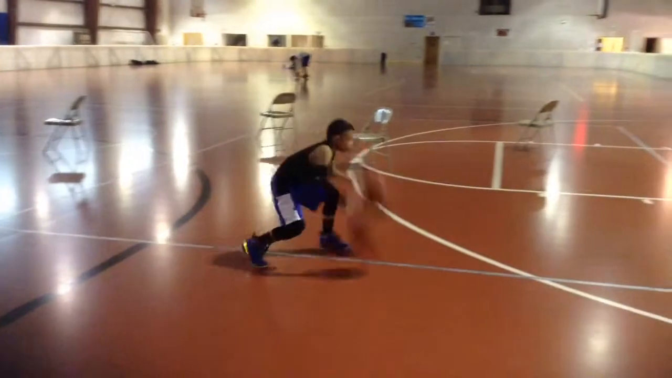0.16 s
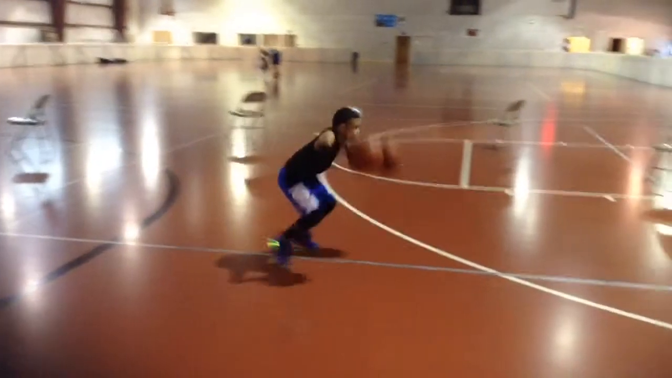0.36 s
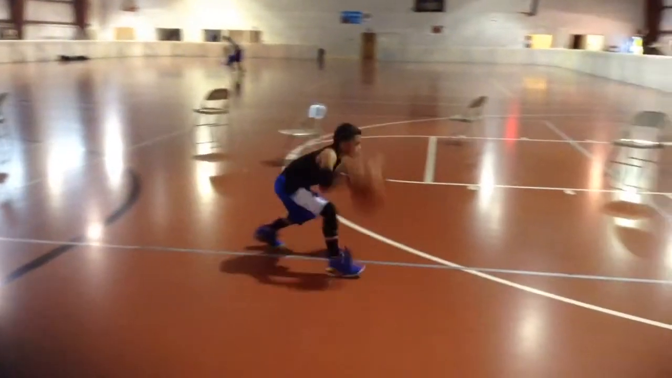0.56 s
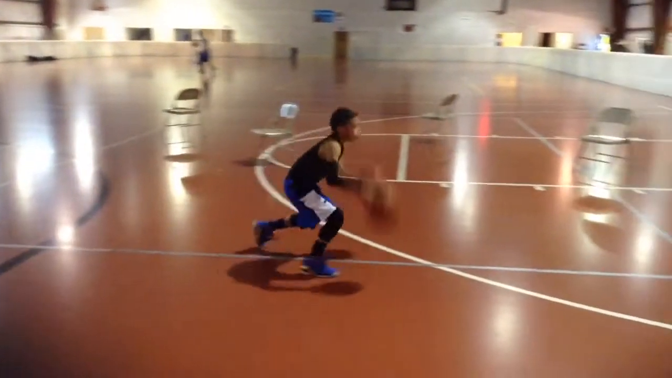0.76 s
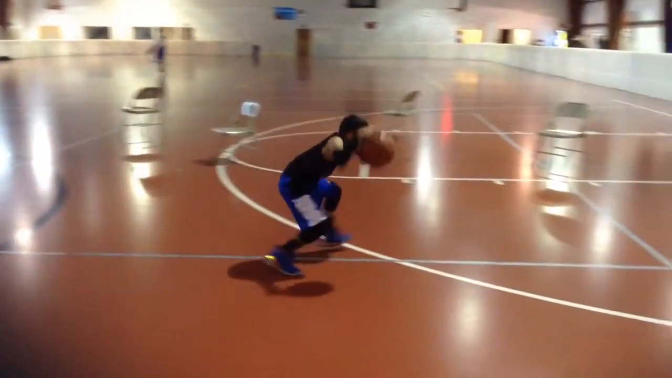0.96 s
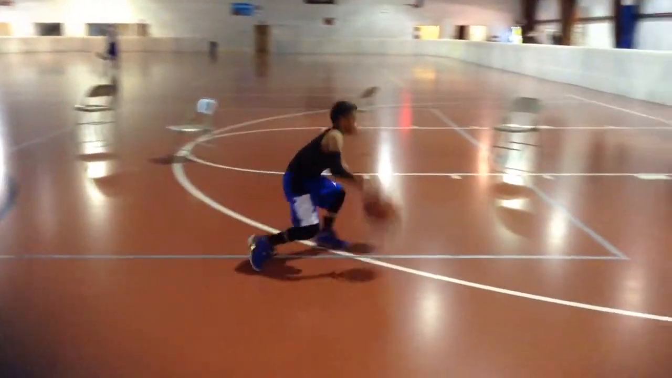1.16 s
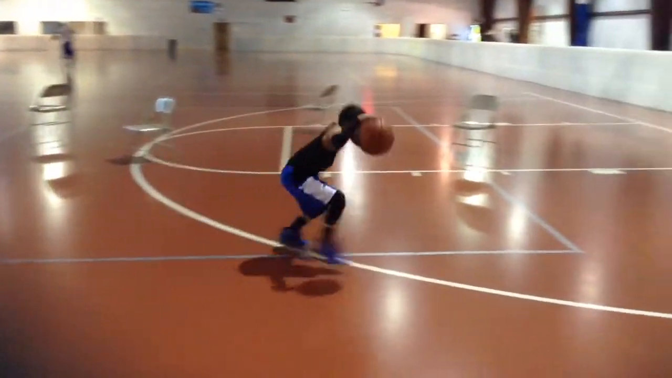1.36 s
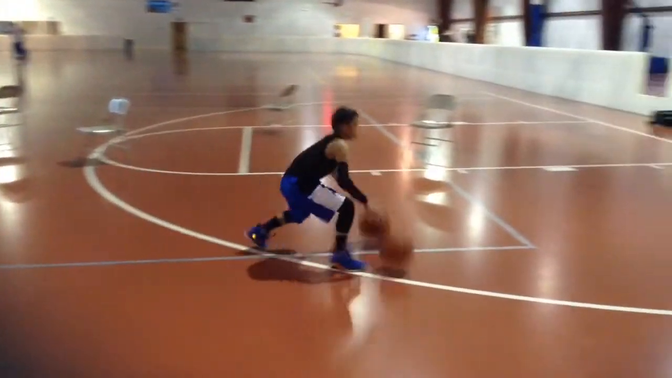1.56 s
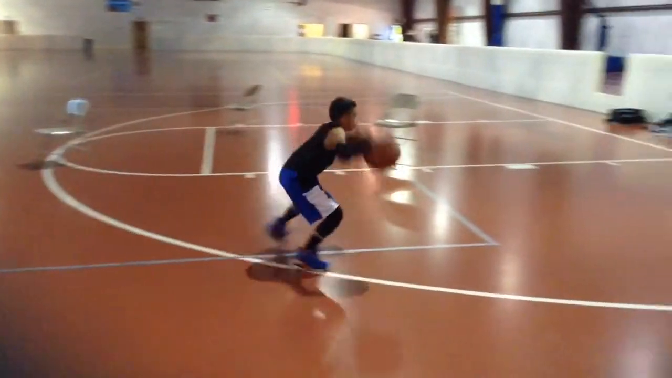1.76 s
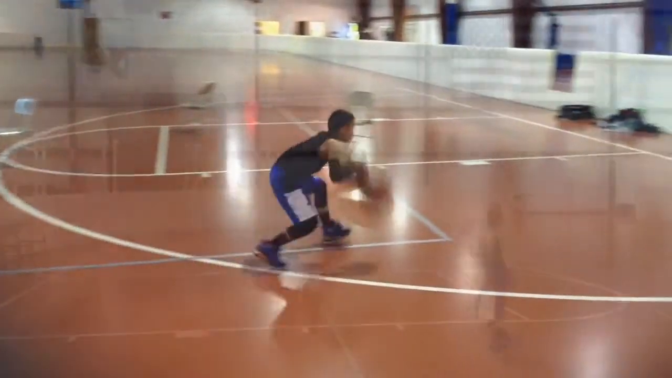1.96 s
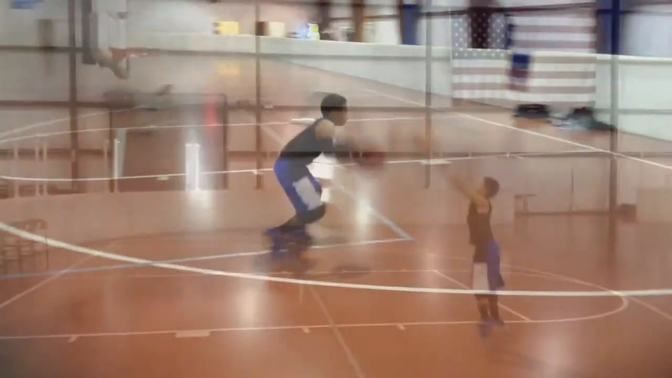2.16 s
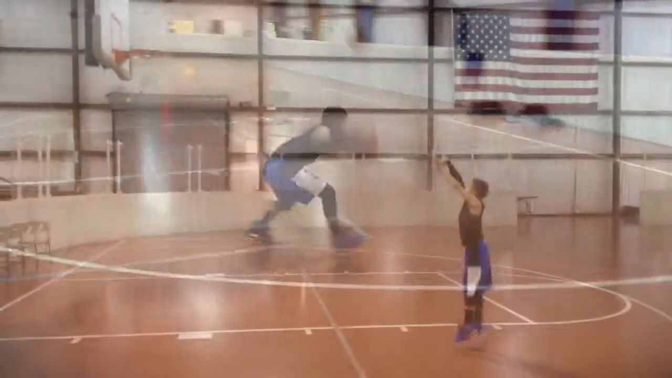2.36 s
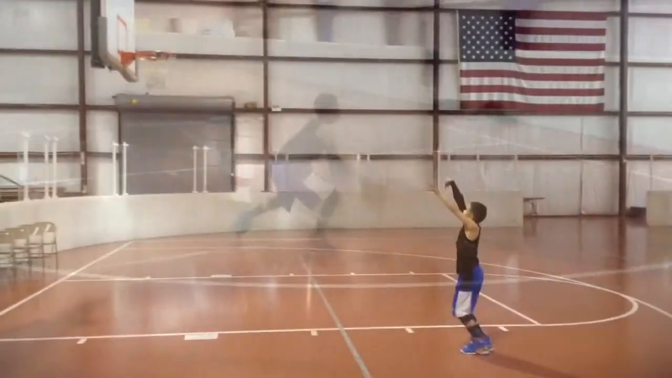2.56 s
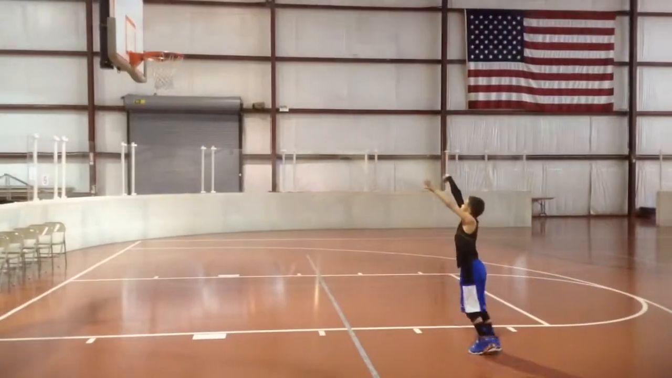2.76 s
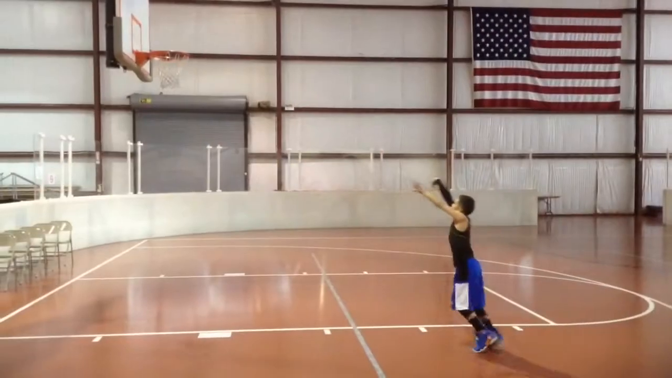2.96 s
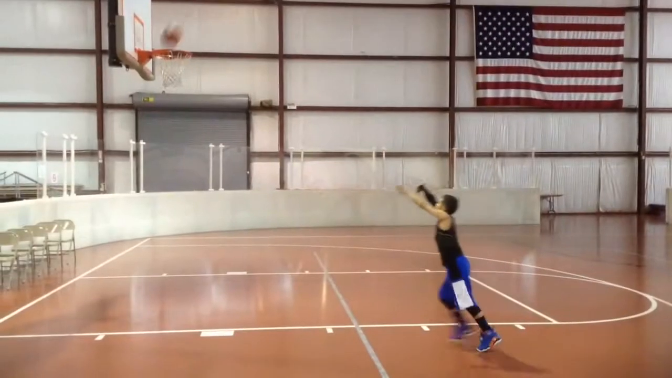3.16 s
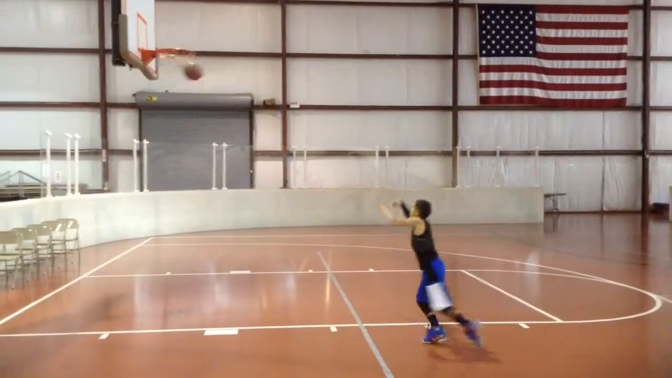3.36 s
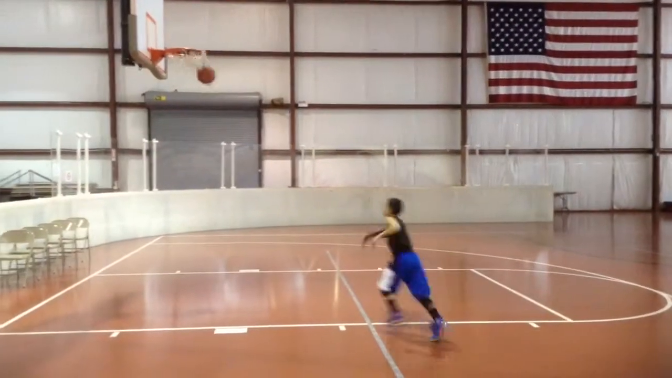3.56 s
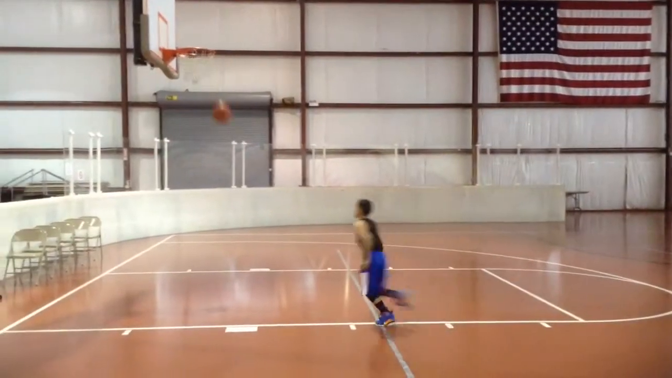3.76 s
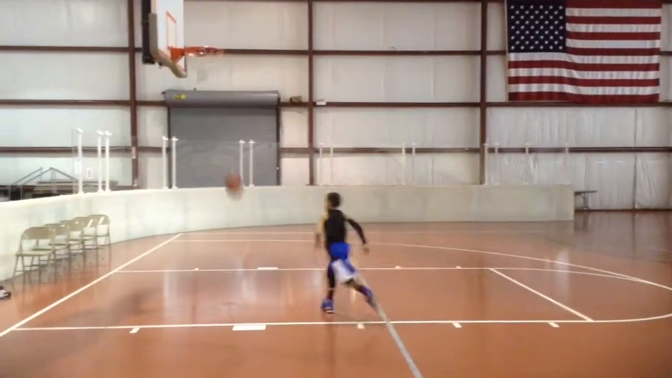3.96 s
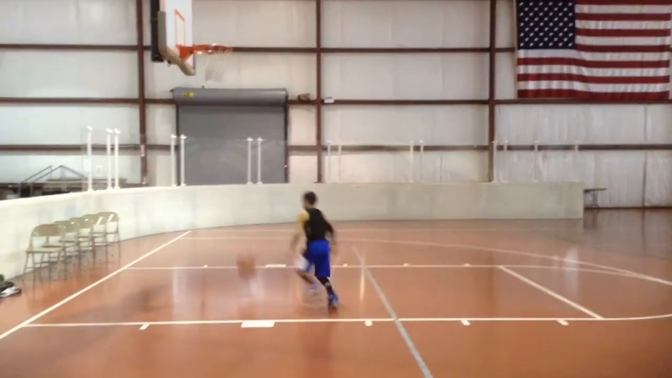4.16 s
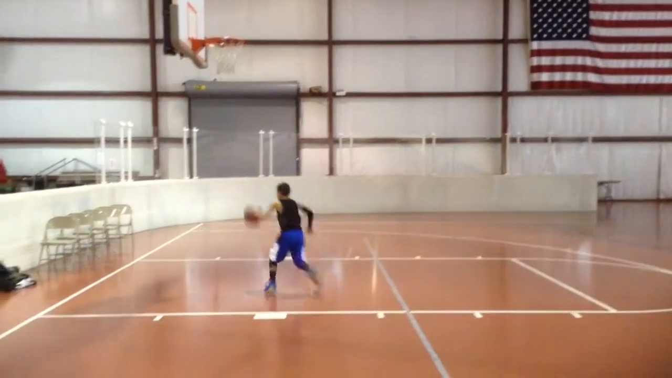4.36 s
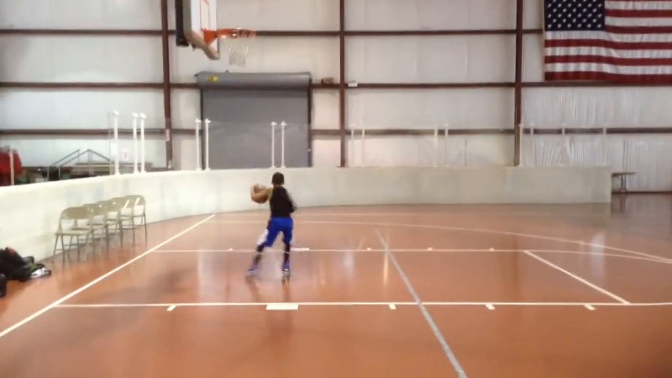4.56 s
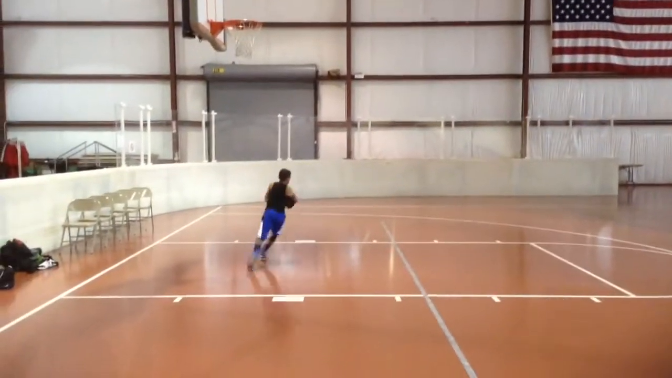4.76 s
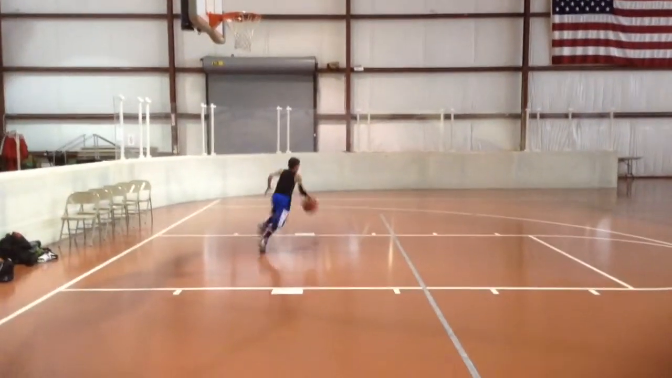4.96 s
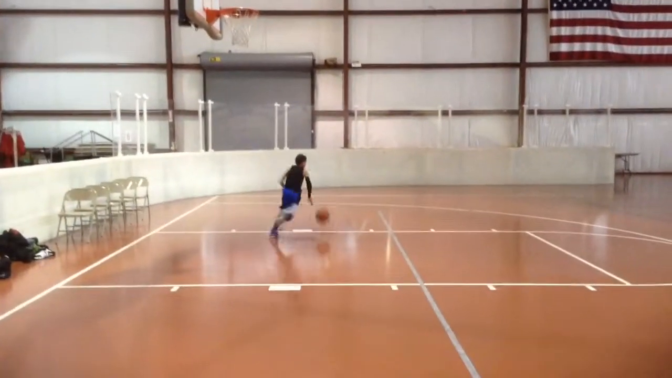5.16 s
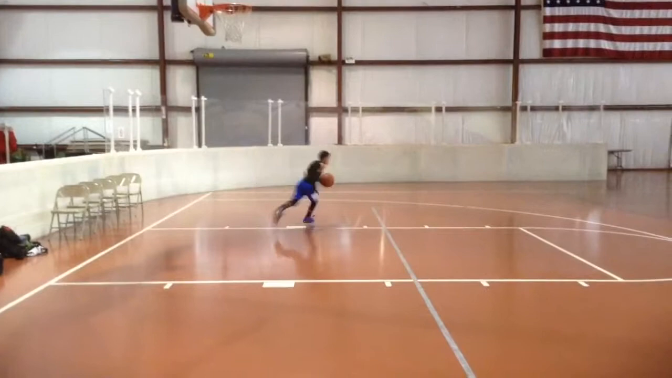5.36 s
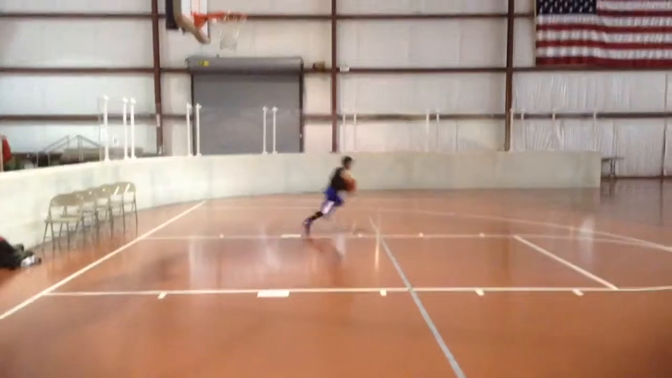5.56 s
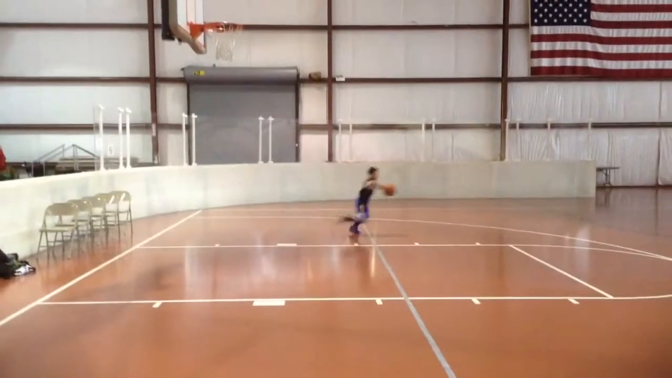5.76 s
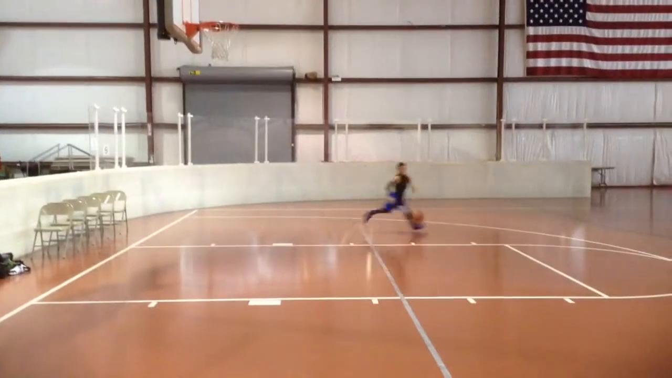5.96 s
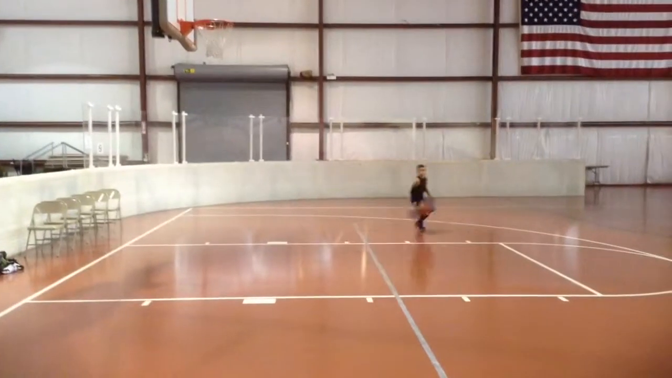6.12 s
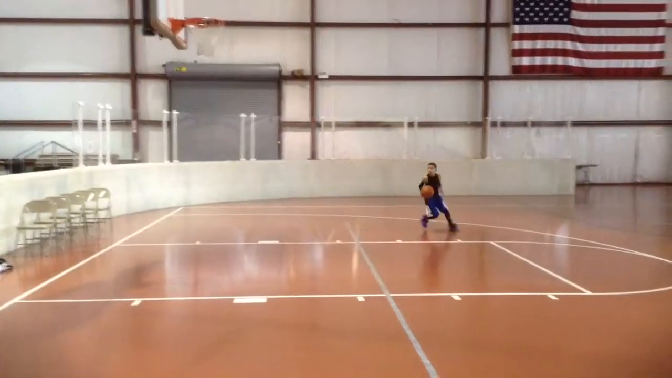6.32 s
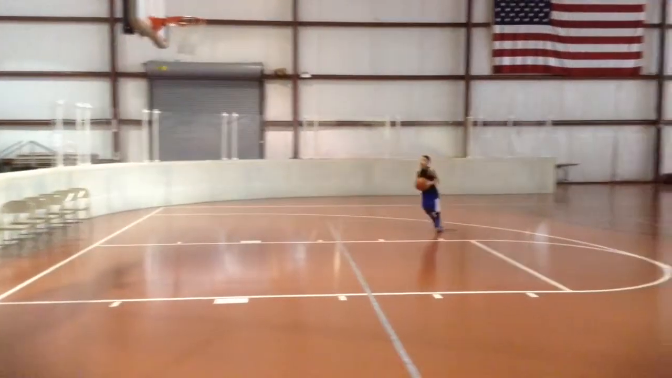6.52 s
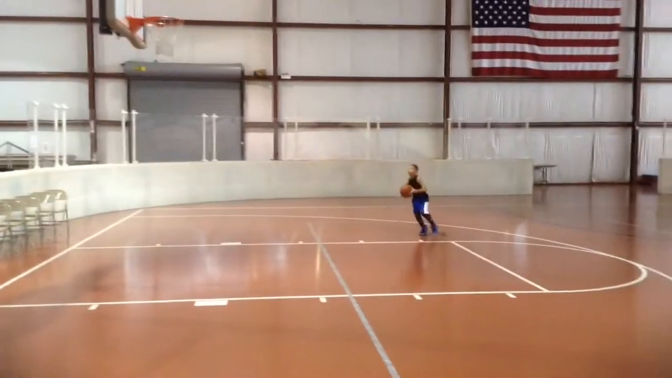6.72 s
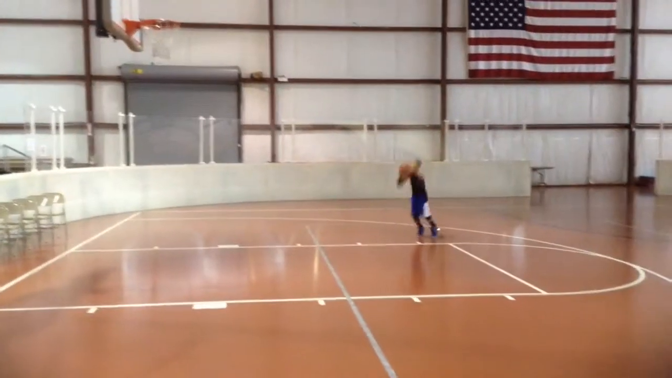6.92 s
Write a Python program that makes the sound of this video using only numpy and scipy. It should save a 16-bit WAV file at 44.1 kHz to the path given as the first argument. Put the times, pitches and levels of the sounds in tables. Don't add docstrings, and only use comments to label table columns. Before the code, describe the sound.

Paired basketball bounces strike close to a small microphone, each a sharp slap, low floor thump and short hollow ring, with long metallic-walled reverberation. After five strong pairs they fade away. Then come a dull knock, quick shoe scuffs, soft running feet, a hard distant rebound, a smack of catching hands, and two lighter spaced dribbles over steady ventilation rumble.

```python
import sys
import numpy as np
from scipy import signal
from scipy.fft import rfft, irfft, next_fast_len
from scipy.io import wavfile
from scipy.ndimage import uniform_filter1d

SR = 44100
rng = np.random.default_rng(int(sys.argv[2]) if len(sys.argv) > 2 else 0)


def generate_wav(sig):
    pcm = np.round(np.clip(np.atleast_2d(sig).T, -1, 1) * 32767).astype(np.int16)
    wavfile.write(sys.argv[1], SR, pcm)


def ratio(d):
    e = np.asarray(d, float) / 20
    return 10 ** e


N = 308254
T = np.arange(SR // 5) / SR

# start in seconds, thump level in dB,
# then slap, crackle and ring in dB over the thump.
DRIBBLES = [(0.2561, -10, 3, 0.5, -4), (0.2824, -10, 3.5, -6, -1), (0.7203, -9.5, 7, -3.5, -2),
            (0.7261, -9, -2, -6, -13), (1.1690, -11, 1, -2.5, -6), (1.1810, -7.5, 10.5, -17, -12),
            (1.6378, -9.5, -10, -6.5, -25), (1.6387, -8.5, 7.5, -2.5, -5.5), (2.0788, -12, 2, -2, 1.5),
            (2.0947, -15.5, 5, -3, 7), (2.5591, -24.5, 5, -4, -1), (2.5651, -21.5, 3, 3.5, -9),
            (2.983, -24, 0, -15.5, -12), (2.9979, -34, 12, -13, -22)]
# pitch in Hz, level in dB, time to fall 60 dB in seconds.
SHELL = [(1170, 0, .022), (2050, -7, .016), (1550, -10, .02), (3900, -20, .012)]


def unit(x):
    return x / np.sqrt(np.mean(x ** 2) + 1e-20)


def along(points, hz):
    f, v = np.transpose(points)
    return np.interp(np.log(hz + 1), np.log(f + 1), v)


def filtered(x, response):
    m = next_fast_len(len(x) + 4096)
    hz = np.fft.rfftfreq(m, 1 / SR)
    return irfft(rfft(x, m) * response(hz), m)[:len(x)]


def band(centre_hz, width_hz):
    return lambda f: 1j * f * width_hz / (centre_hz ** 2 - f * f + 1j * f * width_hz)


def add(track, s, sound):
    i = round(s * SR)
    start = max(i, 0)
    part = sound[max(-i, 0):][:len(track) - start]
    track[start:][:len(part)] += part


def ring(modes, spread):
    out = np.zeros(len(T))
    for hz, db, t60 in modes:
        level_change_db = 1.5 * rng.standard_normal()
        pitch_change = spread * rng.standard_normal()
        decay = ratio(db + level_change_db - 60 * T / t60)
        out += decay * np.sin(2 * np.pi * hz * (1 + pitch_change) * T)
    return out


def fans():
    # frequency in Hz, level in dB per Hz.
    air_colour = [(18, -64), (30, -46.0), (163, -1.5), (228, -1.0), (312, -7), (472, -7.5), (524, -10.5),
                  (754, -15), (815, -15.0), (1970, -26.5), (2490, -27.5), (4310, -33.5), (5880, -35.5),
                  (15000, -38)][:-1]
    # frequency in Hz, size in dB.
    gusts = [(100, 1.5), (1000, 1.8), (3000, .8)]
    # pitch in Hz, level in dB, width in Hz.
    hum = [(175, -64, 4.6), (402.5, -59.5, 7), (469, -58.5, 1.25)]
    whine = [(5880, -89, 80), (6550, -80, 120)]
    hz, _, z = signal.stft(rng.standard_normal(N + 1024), SR, nperseg=1024)
    patches = uniform_filter1d(rng.standard_normal(z.shape), 8, 0)
    patches = unit(uniform_filter1d(patches, 8, 1))
    gusty = z * ratio(along(gusts, hz)[:, None] * patches)
    air = signal.istft(gusty, nperseg=1024)[1][:N]
    out = ratio(-47) * unit(filtered(air, lambda f: ratio(along(air_colour, f))))
    for pitch_hz, db, width_hz in hum + whine:
        out += ratio(db) * unit(filtered(rng.standard_normal(N), band(pitch_hz, width_hz)))
    return out


def tail(build_ms, near_db, treble_db, bass_db):
    # frequency in Hz, time to fall 60 dB in seconds.
    ringing = [(100, 3.6), (400, 2.57), (1200, 3.07), (2000, 3.35), (4000, 1.32), (8000, 0.87),
               (15000, 0.68)]
    # frequency in Hz, level in dB per Hz.
    answer = [(60, -33), (125, 2.5), (230, -2.5), (400, -7), (520, -9), (800, -11.5), (1000, -8.5),
              (1300, -6.5), (1600, -11), (2000, -11), (2350, -15.5), (2750, -15.5), (5000, -26),
              (13000, -31.5)]
    hz, t, z = signal.stft(rng.standard_normal(2 * SR), SR, nperseg=256)
    patches = unit(uniform_filter1d(rng.standard_normal(z.shape), 14, 0))
    grains = ratio(3.2 * np.exp(-t / .6) * patches)
    decay = ratio(-60 * t / along(ringing, hz)[:, None])
    build_up = 1 - np.exp(-1000 * t / build_ms)
    late = decay * build_up * np.cos(np.pi * t / 4)
    near = ratio(near_db - 60 * t / 0.36) * np.clip(t / .012, 0, 1)
    noise = signal.istft(z * grains * (late + near), SR, nperseg=256)[1]
    tilt = [(500, bass_db), (1000, 0), (2500, 0), (5000, treble_db)]
    panels = unit(uniform_filter1d(rng.standard_normal(SR // 10), size=3))

    def colour(f):
        sheets_db = 2.32 * panels[(f / 5).astype(int) % len(panels)]
        return ratio(along(answer, f) + along(tilt, f) + 13.4 + sheets_db)

    return filtered(noise, colour)


def hall():
    # start in seconds, level in dB.
    near_blows = [
        (-.21, -28),
        (.265, -30),
        (.725, -34),
        (1.175, -33),
        (1.642, -36),
        (2.085, -37),
    ]
    # start in seconds, level in dB, treble in dB.
    far_blows = [
        (2.563, -47, 7),
        (2.99, -46, -3),
        (4.268, -39.5, 8),
        (5.182, -42.5, 4.5),
        (6.125, -43, 4),
    ]
    # start in seconds, level in dB, treble in dB, bass in dB.
    soft_knocks = [
        (3.045, -37, -56, -11),
        (3.26, -46, 0, 4.5),
        (4.05, -52, -3, 4),
        (4.71, -49.5, 9, -20),
        (5.78, -56.5, 6, 4),
    ]
    # time in seconds, level in dB.
    fade = [
        (0, -1),
        (2.1, 6.5),
        (2.5, 2),
        (2.9, -12),
        (3.2, -37.5),
    ]
    first, second = np.zeros(N), np.zeros(N)
    far_build_ms, far_near_db, far_bass_db = 24, 1.2, -1.5
    for s, db in near_blows:
        add(first, s, ratio(db) * tail(18.5, -2.5, treble_db=4, bass_db=-3))
    for s, db, treble_db in far_blows:
        add(second, s, ratio(db) * tail(far_build_ms, far_near_db, treble_db, far_bass_db))
    for s, db, treble_db in far_blows[2:]:
        add(second, s + .085, ratio(db) * tail(far_build_ms, far_near_db, treble_db - 2.5, far_bass_db))
    for s, db, treble_db, bass_db in soft_knocks:
        add(second, s, ratio(db) * tail(far_build_ms, far_near_db - 7, treble_db, bass_db))
    fade_db = np.interp(np.arange(N) / SR, *np.transpose(fade))
    return first * ratio(fade_db) + second


def rub(hz, rough_db):
    roughness = np.repeat(rng.standard_normal(len(T) // 60), 60)
    grains = rng.standard_normal(len(T)) * ratio(rough_db * roughness)
    return unit(filtered(grains, lambda f: band(hz, .9 * hz)(f) ** 2))


def brush(hz, length_ms):
    swell = np.sin(np.pi * np.clip(T * 1000 / length_ms, 0, 1) ** 0.77)
    return rub(hz, rough_db=-3.5) * swell


def palms():
    out = np.zeros(N)
    for s, *_ in DRIBBLES[:10:2]:
        add(out, s - 0.06, ratio(-54.5) * brush(7700, length_ms=150))
    return out


def crackle(t60):
    # frequency in Hz, level in dB.
    pebbles = [(300, -13), (1500, -5), (2800, 3.5), (4200, 3), (7000, 1), (9000, -6), (11500, 1),
               (13500, -1.5), (15500, -31)]
    noise = filtered(rng.standard_normal(len(T)), lambda f: ratio(along(pebbles, f)))
    return ratio(-60 * T / t60) * unit(noise)


def slap(width_ms, rebound):
    u = (T[:64] - T[16]) * 1000 / width_ms
    return -np.exp(-u ** 2) + rebound * np.exp(-((u - 3.5) / 1.4) ** 2)


def balls():
    rebounds = [
        (4.263, -15, 12.5, 2.5, -8),
        (4.2710, -16, -2, 2.5, -3),
        (5.1796, -25, 9, -2.5, 7),
        (5.187, -20, -5, -16, -7),
        (6.1216, -25, 7, -1.5, 5.5),
        (6.131, -27.5, 0, 3, 5),
    ]
    # pitch in Hz, level in dB, time to fall 60 dB
    # in seconds.
    near_boards = [(222.3, -4, 0.077), (143.6, -8.5, 0.22), (308, -5.5, 0.073), (402.4, -11, 0.14)]
    far_boards = [(247, 2, 0.064), (152, -15, 0.17), (340, -11, 0.041)]
    far_shell = [(1145, -4.5, 0.02), (1800, -5, 0.012), (4500, -17, 0.0096)]
    peeling = [(933, 2, 0.0094), (1730, -0.5, 0.0039), (765, -12, 0.019)]
    contact_s, jolt_s = .0103, 0.033
    out, jolts = np.zeros(N), np.zeros(N)
    swell = 1 - np.exp(-T / .001)
    for s, thump_db, slap_over_db, crackle_over_db, ring_over_db in DRIBBLES + rebounds:
        slap_db = thump_db + slap_over_db
        crackle_db = thump_db + crackle_over_db
        ring_db = thump_db + ring_over_db
        lift_db = thump_db + (1 if s < 2.9 else -5.5)
        shell = SHELL if s < 5 else far_shell
        boards = near_boards if s < 5 else far_boards
        add(jolts, s, ratio(thump_db - 46) * np.sin(2 * np.pi * np.clip(T / jolt_s, 0, 1)))
        air_slap = slap(.028, .7) if 4 < s < 5 else slap(.07, .4)
        add(out, s - T[16], ratio(slap_db) * air_slap)
        add(out, s - .0002, ratio(crackle_db + 3) * crackle(t60=.006))
        add(out, s, ratio(crackle_db - 18) * crackle(t60=0.039))
        add(out, s + .0001, ratio(ring_db + 2) * ring(shell, .025) + ratio(thump_db - 4) * ring(boards, .05))
        spring = ratio(lift_db + 4) * swell * ring(peeling, .04)
        add(out, s + contact_s, spring + ratio(lift_db - 12) * ring(boards, .05))
        add(out, s + contact_s, ratio((crackle_db + lift_db) / 2 - 13) * crackle(t60=0.012))

    def no_deep_bass(f):
        u = f / 108
        return ((1j * u) ** 2 / (1 + 1.3j * u - u ** 2)) ** 2

    return filtered(out, no_deep_bass) + jolts


def clicks(rows, ring_db, modes):
    out = np.zeros(N)
    envelope = ratio(-60 * T / 0.0063) * (1 - np.exp(-T / 0.00017))
    for s, db, bright_hz in rows:
        burst = envelope * rng.standard_normal(len(T))
        peak = band(bright_hz, 1.3 * bright_hz)
        click = filtered(burst, lambda f: peak(f) ** 2 / (1 + 1j * f / (1.5 * bright_hz)) ** 2)
        click = click / np.abs(click).max()
        add(out, s, ratio(db) * (click + ratio(ring_db) * ring(modes, spread=0.056)))
    return out


def footsteps():
    # start in seconds, peak in dB, brightness in Hz.
    steps = [(.353, -24, 350), (.513, -25.5, 400), (3.892, -34.5, 1000), (3.979, -34, 294),
             (4.05, -36, 800), (4.075, -34, 347), (4.656, -46, 910), (4.687, -36, 300), (4.724, -28.5, 295),
             (5.222, -36, 400), (5.783, -36, 600), (6.117, -35, 500)]
    return clicks(steps, ring_db=-20, modes=SHELL)


def walls():
    # start in seconds, peak in dB, brightness in Hz.
    echoes = [(1.223, -28, 3540), (1.2348, -18, 1960), (1.752, -43, 1210), (1.798, -42.5, 1284),
              (2.1642, -22, 2605), (3.037, -28, 2400), (3.084, -31.5, 1800), (3.189, -41, 1560),
              (4.282, -30, 5500), (4.297, -31, 3500), (4.3839, -25, 2200), (4.3841, -26, 8000),
              (5.211, -43, 2600), (5.2935, -35, 3000), (5.326, -33, 1700), (5.3324, -27, 2600),
              (5.372, -31.5, 1500), (6.142, -40, 4500), (6.152, -31, 2700), (6.234, -38, 1800),
              (6.25, -36, 1300), (6.2683, -28.5, 3200)]
    return clicks(echoes, ring_db=-5.5, modes=SHELL)


def shoes():
    # start in seconds, level in dB, centre in Hz, length in ms.
    slides = [
        (3.02, -59.5, 4500, 170),
        (3.28, -62, 9000, 71),
        (3.345, -54, 7500, 63),
        (3.82, -64, 12500, 60),
        (4.395, -46.5, 12100, 27),
        (4.661, -54, 11500, 59),
        (5.77, -65, 12000, 70),
    ]
    # start in seconds, peak in dB, centre in Hz.
    scuffs = [(3.266, -45, 5870), (3.2844, -45, 9600), (3.373, -38, 4740), (3.4177, -49, 6070),
              (3.5187, -46, 5510), (3.7854, -48, 11800), (3.7976, -38.5, 12800), (3.8921, -47, 10700),
              (3.9094, -48, 9080), (4.049, -49, 12200), (4.0644, -44, 3870), (4.663, -53, 4200),
              (4.7054, -36, 13900), (4.9826, -50, 6100), (5.8094, -49, 14000), (6.17, -47, 10500),
              (6.25, -47, 8500), (6.401, -52, 10000), (6.4717, -41, 9000), (6.8723, -47, 12400)]
    out = np.zeros(N)
    for s, db, hz, length_ms in slides:
        add(out, s, ratio(db) * brush(hz, length_ms))
    u = T * 1000 / 8.8
    for s, db, hz in scuffs:
        add(out, s - .001, ratio(db - 1) * rub(hz, rough_db=8) * 7 * u * np.exp(-5 * u))
    return out


def catches():
    # start in seconds, peak in dB, brightness in Hz.
    smacks = [
        (4.715, -31.5, 2300),
        (4.7225, -36.5, 5030),
        (4.877, -43, 2200),
    ]
    # pitch in Hz, level in dB, time to fall 60 dB in seconds.
    held = [(1330, -0.5, 0.024), (2300, -3, .025), (4200, -16, .012)]
    return clicks(smacks, ring_db=0, modes=held)


def scene():
    action = palms() + balls() + footsteps() + walls() + shoes() + catches()
    return (fans() + hall() + action)[None]


def band_limit(x):
    return signal.sosfilt(signal.butter(12, 16500, fs=SR, output="sos"), x)


def record(dry):
    # centre in Hz, width in Hz, added share.
    capsule = [(3036, 1050, -0.28), (6230, 1900, 0.12), (9300, 7400, -0.089), (11200, 1100, 0.015)]
    housing = lambda f: 1 + sum(share * band(hz, width_hz)(f) for hz, width_hz, share in capsule)
    coloured = filtered(dry[0], housing)
    rounded = coloured / (1 + np.abs(coloured / .97) ** 8) ** (1 / 8)
    top_cut = lambda f: np.where(f < 15300, 1, ratio(-34))
    mix = filtered(rounded, top_cut)[None]
    return band_limit(mix)


dry = scene()
out = record(dry)
generate_wav(out)
```